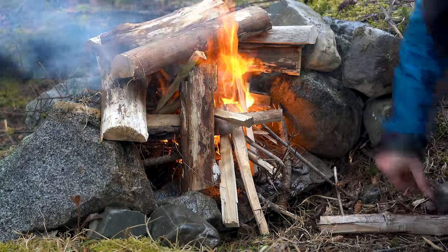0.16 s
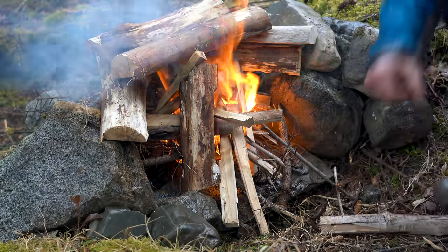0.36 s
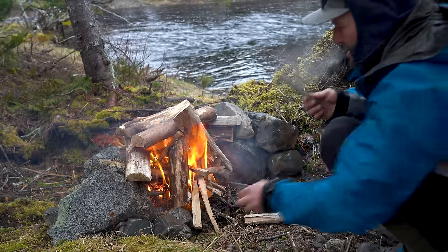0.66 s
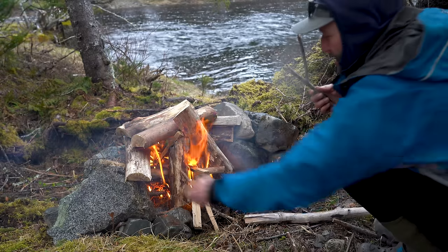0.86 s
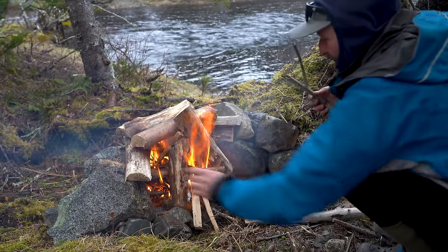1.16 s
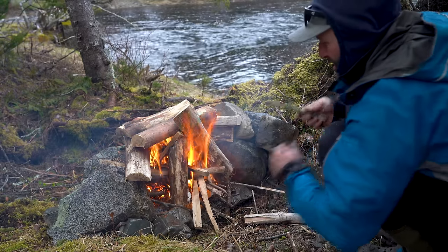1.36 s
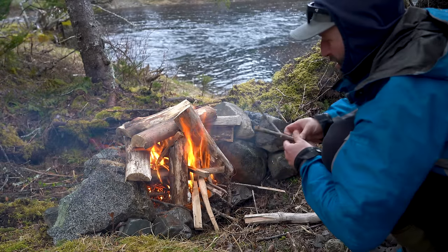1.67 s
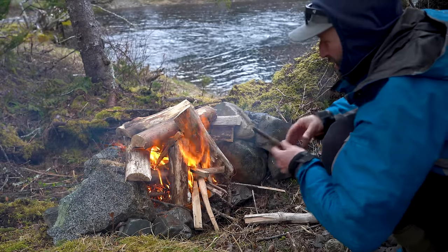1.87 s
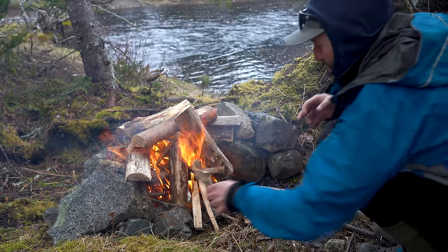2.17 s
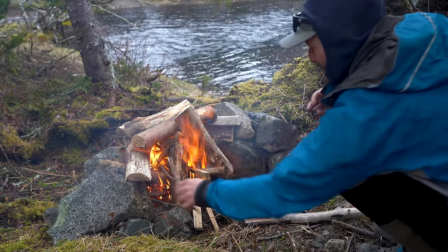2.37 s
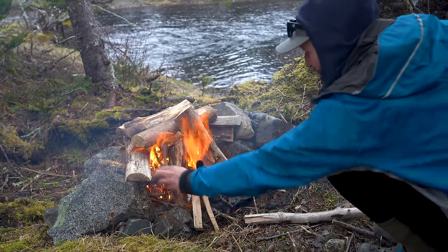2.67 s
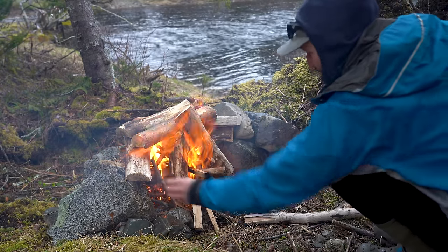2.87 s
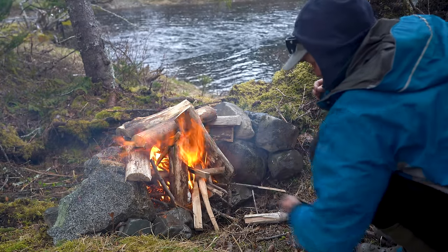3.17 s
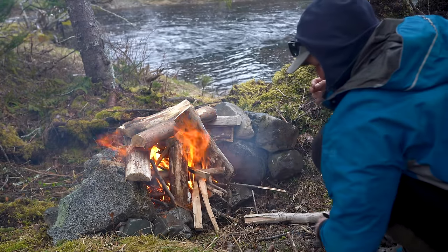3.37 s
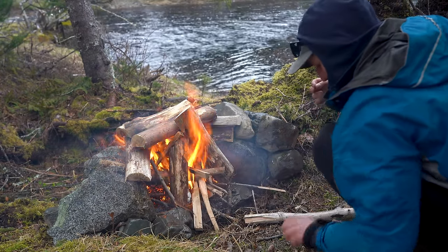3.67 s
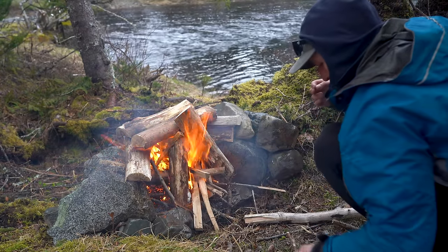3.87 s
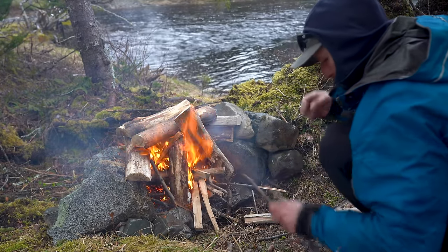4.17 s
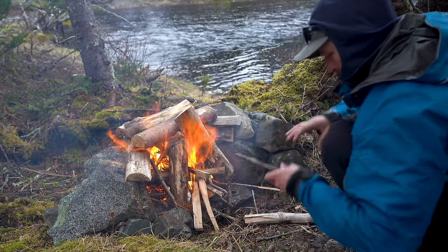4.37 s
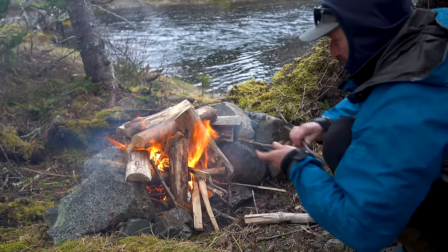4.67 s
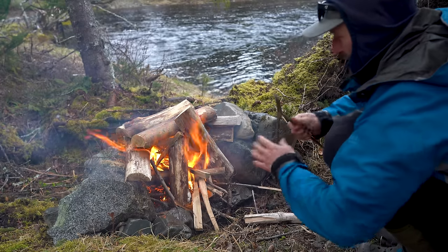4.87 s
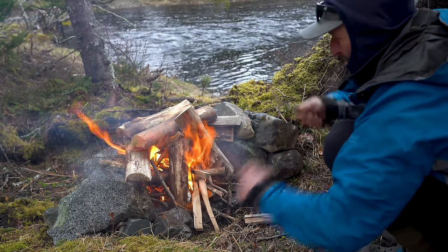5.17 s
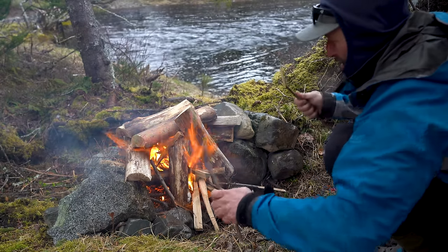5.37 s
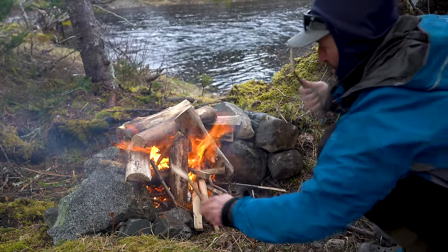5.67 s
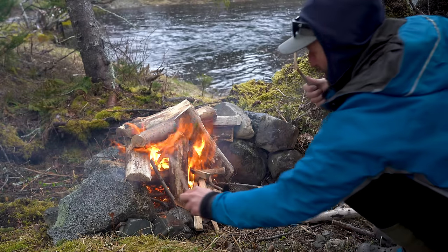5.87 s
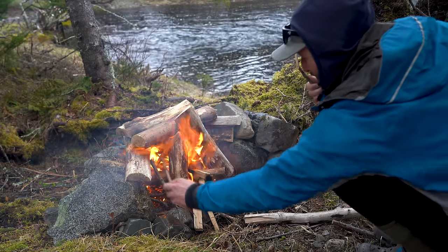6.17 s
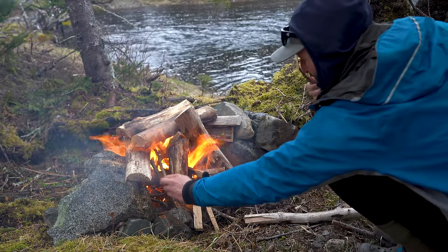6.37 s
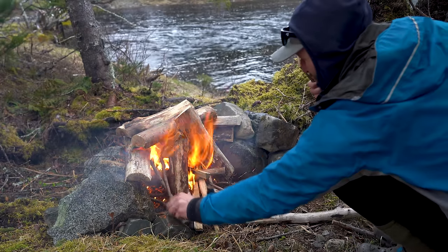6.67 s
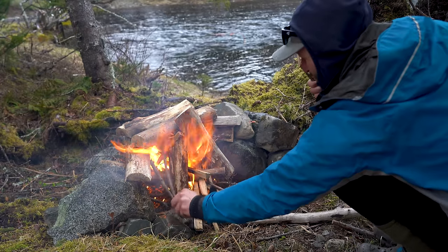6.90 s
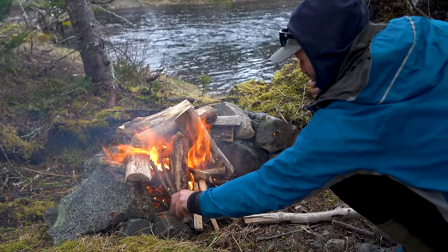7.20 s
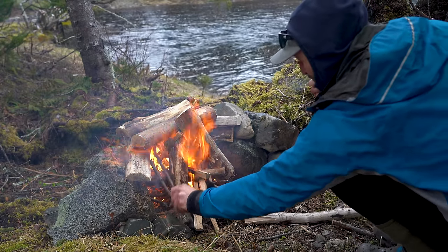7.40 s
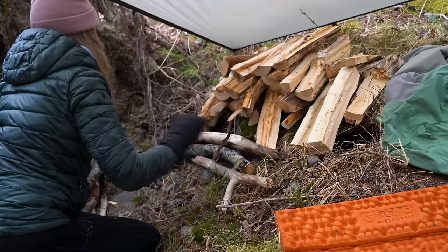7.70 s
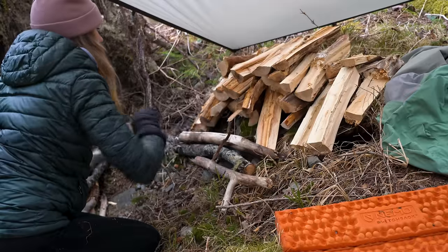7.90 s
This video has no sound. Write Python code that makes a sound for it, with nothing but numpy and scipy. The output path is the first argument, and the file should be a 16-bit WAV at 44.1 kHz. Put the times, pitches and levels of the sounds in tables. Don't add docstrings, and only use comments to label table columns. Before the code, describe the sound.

Nearly mono, close outdoor sound of a split-wood fire in a stone ring, with a soft, broad river wash and faint microphone hiss throughout. At 0.01 s a dry stick breaks violently, several clicks within 0.05 s, clipping, far louder than everything else, with a low air puff. Dense tiny crackle then continues, slightly swelling and easing, dotted with dry one-cycle pops and thin bright spark fizzes. Ticks cluster around 1.0-1.3 s, with a light stick-on-log knock at 1.15. Pops stand out at 2.7-2.9 and 3.2-3.3. A sleeve brushes at 4.05, a sharp pop hits at 4.39, and low puffs bump at 4.6-4.9. A ragged, smaller stick snap splinters at 5.15-5.18. Bright spits follow at 5.43 and 6.32, a flame flare at 6.6, then pops at 7.3 and 7.7. Flames and low air rise near 7.9; crackle runs to the end, about 8 s. Short stone echoes.

```python
import sys
import numpy as np
from scipy import signal
from scipy.fft import rfft, irfft
from scipy.io import wavfile
from scipy.ndimage import uniform_filter1d

SR = 44100
rng = np.random.default_rng(int(sys.argv[2]) if len(sys.argv) > 2 else 0)


def store_pcm(level_fs):
    pcm = np.round(np.clip(level_fs, -1, 1) * 32767).astype(np.int16)
    wavfile.write(sys.argv[1], SR, np.atleast_2d(pcm).T)


def to_linear_factor(level_db):
    exponent = np.asarray(level_db, float) / 20
    return 10 ** exponent


N = 354679

# (time [s], level [dB])
BURN_DB = [(.08, 2), (.32, -.5), (.8, 1.5), (1.1, 2.5), (1.52, -2), (2.05, .5), (2.55, -0.63), (3.25, 0.57),
           (4.14, -1), (4.5, 1), (4.95, -1.16), (6.0, 0.33), (6.73, -2), (7.4, 0.58), (8.04, 2.5)]
SMALL_COUNT, SMALL_HZ = 160, 1584
CRACK_MS = 1


def evened(x):
    return x / np.sqrt(np.mean(x ** 2) + 1e-20)


def read(points, hz):
    f, value = np.transpose(points)
    return np.interp(np.log(hz + 1), np.log(f + 1), value)


def curve(rows):
    s, db = np.transpose(rows)
    return np.interp(np.arange(N) / SR, s, db)


def swells(rows):
    t = np.arange(N) / SR
    return sum(db * np.exp(-((t - s) / half_s) ** 2) for s, db, half_s in rows)


def add(mix, s, sound):
    part = mix[round(s * SR):][:len(sound)]
    part += sound[:len(part)]


def ring(x, hz, width_hz):
    r = np.exp(-np.pi * width_hz / SR)
    turn = 2 * np.pi * min(hz, 16000) / SR
    return signal.lfilter([1, 0, -r], [1, -2 * r * np.cos(turn), r * r], x)


def ring_twice(x, first, second):
    return evened(ring(ring(x, *first), *second))


def band_noise(low_hz, high_hz):
    band = signal.butter(2, [low_hz, high_hz], "band", fs=SR, output="sos")
    return evened(signal.sosfilt(band, rng.standard_normal(N)))


def coloured(points, patch_db=0., flicker_db=0.):
    frames, hz = N // 256 + 5, np.fft.rfftfreq(1024, 1 / SR)
    a, b, patches = rng.standard_normal((frames, 513, 3)).T
    patches = uniform_filter1d(patches, size=12, axis=0)
    patches = evened(uniform_filter1d(patches, size=10, axis=1))
    flicker = evened(uniform_filter1d(rng.standard_normal(frames), size=4))
    level_db = read(points, hz)[:, None] + patch_db * patches + flicker_db * flicker
    z = (a + 1j * b) * to_linear_factor(level_db)
    return evened(signal.istft(z, nperseg=1024, noverlap=768)[1][:N])


def microphone_hiss():
    # (frequency [Hz], density [dB per Hz])
    hiss_colour = [(3000, -19.5), (6000, 1.5), (9000, -3), (15800, -2.5), (17000, -30)]
    return coloured(hiss_colour) * to_linear_factor(-70.5)


def port_hiss():
    # (frequency [Hz], density [dB per Hz])
    apart_colour = [(15, -27), (25, 3), (228, -13.5), (412, -13.5), (809, -19.5), (926, -42), (3560, -44),
                    (4300, -22.5), (6990, -17.5), (15700, -14)]
    return coloured(apart_colour) * to_linear_factor(-73.5)


def river():
    # (frequency [Hz], density [dB per Hz])
    wash_colour = [(88, -30.5), (150, -8), (229, 5), (303, -4), (454, -2.5), (513, -2.5), (1000, -1),
                   (3080, -10.5), (5040, -17), (6330, -26.5), (10000, -34.5), (13000, -61.5), (22000, -120)]
    wash_db, burn_share = -49, 0.6
    return coloured(wash_colour, patch_db=1.5, flicker_db=1.5) * to_linear_factor(wash_db + burn_share * curve(BURN_DB))


def flames():
    # (time [s], rise over the calm [dB], half length [s])
    puff_rows = [
        (.01, 14, .06),
        (.3, 2, 0.11),
        (1.2, -9, 0.27),
        (2.6, 2, .2),
        (4.38, 5, 0.13),
        (4.64, 13, .09),
        (4.89, 12.5, 0.075),
        (5.7, 5, 0.44),
        (7.85, 10, .13),
    ]
    # (time [s], rise [dB], half length [s])
    flare_rows = [
        (.05, 3, .3),
        (3.2, 2, 0.32),
        (6.64, 5.5, 0.11),
        (7.9, 4, 0.51),
    ]
    calm_db, roar_db = -62.5, -55
    puffs = band_noise(22, 72) * to_linear_factor(calm_db + swells(puff_rows))
    beat = band_noise(80, 210) * to_linear_factor(roar_db + swells(flare_rows))
    return puffs + beat


def sleeve():
    # (start [s], length [s], level [dB])
    brush_rows = [
        (4.04, 0.095, -51.5),
        (4.68, 0.11, -63),
        (1.282, 0.015, -55.5),
        (2.862, .02, -58),
    ]
    # (frequency [Hz], density [dB per Hz])
    cloth_colour = [(2500, -25), (4500, 3), (6500, -7), (8700, -1), (10500, -11), (15500, -14.5)]
    out, cloth = np.zeros(N), coloured(cloth_colour, flicker_db=1.5)
    for s, length_s, db in brush_rows:
        swell = np.sin(np.pi * np.arange(0, length_s, 1 / SR) / length_s) ** 2.0
        add(out, s, to_linear_factor(db) * swell)
    return out * cloth


def knock():
    # (frequency [Hz], level [dB], t60 [s])
    mode_rows = [(1520, -20.5, 0.025), (1890, -15.5, 0.015), (3700, -20, 0.02), (4200, -42, 0.018),
                 (7540, -24, 0.0083)]
    out, t = np.zeros(N), np.arange(2000) / SR
    modes = sum(to_linear_factor(db - 60 * t / t60_s) * np.sin(2 * np.pi * hz * t) for hz, db, t60_s in mode_rows)
    contact_s = 0.00036
    add(out, 1.1514, modes * np.minimum(t / contact_s, 1))
    return out


def burst(hz, cycles, chance):
    turns = hz * np.arange(420) / SR
    body = -np.sin(2 * np.pi * turns) * np.exp(-turns / cycles) * (1 - np.exp(-turns * 5))
    body = signal.lfilter([1, -1], [1, -np.exp(-2 * np.pi * 0.26 * hz / SR)], body)
    for late, share in np.reshape(chance, (2, 2)):
        delay_s = .0006 + .0035 * late
        body = body + 0.52 * (share - .5) * np.roll(body, round(delay_s * SR))
    return body / abs(body).max()


def crackle(per_s=1100, spread_db=5.0):
    # (frequency [Hz], density [dB per Hz])
    grain_colour = [(180, -37), (300, -11.5), (327, -4.5), (567, 0.5), (694, -0.5), (1260, -4.5),
                    (2660, -5), (5180, -13), (9500, -35), (12400, -61.5), (20900, -120)]
    crackle_db, burn_share = -49.5, 0.8
    clumps = to_linear_factor(2.2 * evened(uniform_filter1d(rng.standard_normal(N), size=700)))
    size = to_linear_factor(spread_db * np.minimum(rng.exponential(1, N), 2.8))
    size *= rng.random(N) < clumps * per_s / SR
    kind, out = rng.integers(0, 24, N), np.zeros(N)
    for k, hz in enumerate(np.geomspace(600, 3500, num=24)):
        out += signal.oaconvolve(size * (kind == k), burst(hz, 0.66, rng.random(4)))[:N]
    spectrum = rfft(out)
    own = np.sqrt(uniform_filter1d(abs(spectrum) ** 2, size=3000)) + 1e-9
    colour = to_linear_factor(read(grain_colour, np.fft.rfftfreq(N, 1 / SR)))
    return evened(irfft(spectrum / own * colour, N)) * to_linear_factor(crackle_db + burn_share * curve(BURN_DB))


def lesser_ticks():
    faintest_db, reach_db, spread_octaves, burn_share = -34, 7, 0.39, 3
    spark_share, spark_below_db, spark_hz = .12, -17.5, 7000
    when, size, spits = rng.random((SMALL_COUNT, 3)).T
    hz = SMALL_HZ * 2 ** (spread_octaves * rng.standard_normal(SMALL_COUNT))
    eager = np.cumsum(to_linear_factor(burn_share * curve(BURN_DB)))
    s = np.interp(when, eager / eager[-1], np.arange(N) / SR)
    db = faintest_db + reach_db * size ** 1.3
    rows = np.transpose([s, db, hz, CRACK_MS + 0 * s])
    spat = [(s, db + spark_below_db, spark_hz) for s, db, _, _ in rows[spits < spark_share]]
    return list(rows), spat


def ticks():
    # (time [s], peak [dB], pitch [Hz], crack [ms])
    clear_rows = [(.573, -23.5, 1250, 1.5), (.5904, -26, 1680, 1.1), (1.044, -25.5, 1020, 1.5),
                  (1.0767, -24, 2170, .8), (1.1869, -23, 1600, .8), (1.2707, -20, 3390, 1.6),
                  (1.337, -24, 1260, 0.89), (2.0503, -25, 2160, 0.97), (2.0659, -25.5, 1950, 0.69),
                  (2.7317, -22, 950, 3.3), (2.8024, -24, 1250, 2.5), (2.8633, -22, 1500, 1.7),
                  (3.2296, -24.5, 1240, .9), (3.2346, -24, 1200, .9), (3.3114, -22.5, 1900, 1.3),
                  (3.7167, -23.5, 2100, 0.73), (3.7777, -23, 1560, 1.1), (3.9844, -23.5, 1680, 0.93),
                  (4.305, -25, 1810, .8), (4.575, -25, 1840, 0.9), (4.812, -24.5, 1480, 1.4),
                  (5.4273, -27, 1250, 9.2), (5.8175, -29.5, 1380, 0.84), (4.3943, -19, 2300, .7),
                  (6.272, -23, 2710, 1.6), (6.5443, -27, 1210, 1.4), (7.3091, -22, 2430, 1.4),
                  (7.3277, -24.5, 1700, 0.99), (7.654, -27.5, 1150, 1.6), (7.711, -26, 945, 1.5)]
    # (time [s], peak [dB], pitch [Hz], tick peak [dB])
    spark_rows = [(0.7644, -34.5, 6910, -30), (1.1168, -35, 9000, -25), (1.2577, -44, 6800, -37),
                  (1.271, -32, 8120, -41), (1.6307, -44, 6800, -30), (1.887, -35.5, 9350, -31),
                  (2.3777, -43.5, 7000, -27), (2.625, -42, 6810, -35), (2.8031, -45, 6750, -34),
                  (3.147, -41.5, 7170, -33), (3.2123, -43, 7170, -33), (3.312, -44, 6390, -42),
                  (3.3446, -48, 7090, -25), (3.7768, -50, 6900, -39), (4.2236, -45, 7100, -39),
                  (4.6592, -49, 6910, -27.5), (4.762, -40.5, 6410, -27), (5.1988, -42, 8180, -28),
                  (5.3142, -40, 6890, -27), (5.4275, -31.5, 6700, -38), (5.6735, -38, 7710, -30.5),
                  (6.1838, -39.5, 7850, -30), (6.3233, -30, 10700, -33), (6.5934, -46, 6870, -33),
                  (6.9882, -42, 7160, -32), (7.2101, -50, 6500, -27), (7.328, -39.5, 7060, -35),
                  (7.599, -43, 7740, -27), (7.727, -43, 6930, -33), (7.955, -42.5, 7890, -27)]
    shortest_cycles, cycles_per_ms = 0.34, 0.083
    crack_db, crack_db_per_octave = -15, 5
    out, t = np.zeros(N), np.arange(600) / SR
    lesser, spat = lesser_ticks()
    throwing = [(s, db, SMALL_HZ, CRACK_MS) for s, _, _, db in spark_rows]
    rows = list(clear_rows) + throwing + lesser
    chances, noises = rng.random((len(rows), 4)), rng.standard_normal((len(rows), 600))
    for (s, db, hz, ms), chance, noise in zip(rows, chances, noises):
        cycles = shortest_cycles + cycles_per_ms * (ms - CRACK_MS)
        add(out, s, to_linear_factor(db - 0.8) * burst(hz * 1.157, cycles, chance))
        crack = evened(ring(noise, 3400, 4500) + 2.4 * ring(noise, hz, hz)) * np.exp(-1000 * t / ms)
        octaves_low = min(np.log2(hz / SMALL_HZ), 0)
        add(out, s, to_linear_factor(db + crack_db + crack_db_per_octave * octaves_low) * crack)
    out = signal.lfilter(*signal.butter(2, 7500, fs=SR), out)

    sparks = [row[:3] for row in spark_rows] + spat
    for (s, db, hz), noise in zip(sparks, rng.standard_normal((len(sparks), 600))):
        fizz = ring_twice(noise + 4.3 * (t == 0), (hz, 0.49 * hz), (hz, 0.73 * hz))
        decay_s = 0.0023 * to_linear_factor(0.39 * (db + 29))
        add(out, s, to_linear_factor(db - 9.5) * fizz * np.exp(-t / decay_s))
    return out


def stones(x):
    t = np.arange(2600) / SR
    signs = rng.choice([-1., 1.], len(t))
    present = (rng.random(len(t)) < .1) * (t > .001)
    taps = to_linear_factor(-26.5 - 60 * t / .04) * signs * present
    taps[0] = 1
    return signal.oaconvolve(x, taps)[:N]


def snaps():
    # (time [s], level [dB], ring [Hz], tearing [ms], treble [dB])
    break_rows = [(0.0116, -3, 3560, 1.2, -7.5), (.0139, -10.5, 3650, 1.3, -4), (0.0149, -8, 3520, 1.6, -9),
                  (0.0263, -15, 2300, .8, -1), (0.029, -15, 3700, 1.1, -1.5),
                  (0.0303, -18, 3040, 0.42, -11), (0.053, -32, 2950, 9, -5),
                  (1.1522, -25.5, 3660, 1.2, -24.5), (4.3951, -33, 3300, .6, -6.5),
                  (5.1455, -19.5, 3000, .9, -5), (5.1474, -22, 3300, 2.6, -18.5),
                  (5.1599, -19, 2150, .9, -7), (5.1618, -26, 3500, 4, -11), (5.1705, -32, 3000, 4, -0.5),
                  (5.1748, -25, 4300, 1.4, 4), (5.1766, -14, 3400, 1.2, -9),
                  (5.1785, -20.5, 3340, 0.46, -9.5)]
    break_t60_ms, after_db, after_t60_ms = 5, -17.5, 75
    out, t = np.zeros(N), np.arange(3000) / SR
    noises = rng.standard_normal((len(break_rows), 3, 3000))
    for (s, db, hz, ms, treble_db), (tear, lumps, air) in zip(break_rows, noises):
        click = 6.5 * (t == t[8])
        ragged = tear * to_linear_factor(3.0 * evened(uniform_filter1d(lumps, size=12))) + click
        tone = ring_twice(ragged, (hz, 1400), (hz, 3000))
        tone += to_linear_factor(-11.5) * ring_twice(ragged, (1900, 1000), (2000, 1600))
        tone += to_linear_factor(-21) * ring_twice(ragged, (1050, 600), (900, 1100))
        tone += to_linear_factor(-15.5) * ring_twice(ragged, (4800, 1500), (4600, 3000))
        treble = evened(ring(ring(air, 8200, 4000), 8200, 9000) + 1.8 * ring(air, 11000, 5500))
        tone += to_linear_factor(treble_db) * treble * np.exp(-t / 0.0098)
        fall = 60 * np.maximum(1000 * t - ms, 0)
        dying = to_linear_factor(-fall / break_t60_ms) + to_linear_factor(after_db - fall / after_t60_ms)
        add(out, s, tone * to_linear_factor(db) * dying * np.minimum(t / 0.00039, 1))
    return out


def scene():
    background = river() + microphone_hiss() + flames() + sleeve()
    middle = background + stones(ticks() + crackle() + knock()) + snaps()
    apart = port_hiss() + to_linear_factor(-40.5) * np.diff(middle, 2, prepend=[0, 0])
    return np.array([middle + apart, middle - apart])


def low_pass(x):
    return signal.sosfilt(signal.butter(12, 15840, fs=SR, output="sos"), x)


def record(dry):
    edge = signal.firwin(101, 15500, fs=SR)[None]
    limited = np.clip(signal.oaconvolve(dry, edge, "same"), -1, 1)
    return low_pass(limited)


dry = scene()
out = record(dry)
store_pcm(out)
```